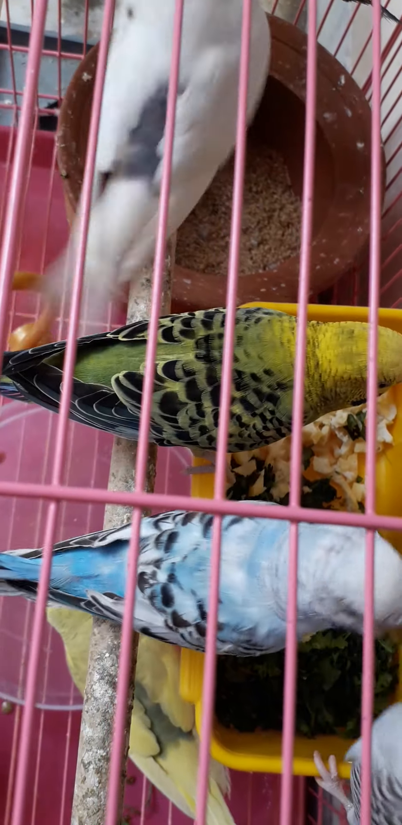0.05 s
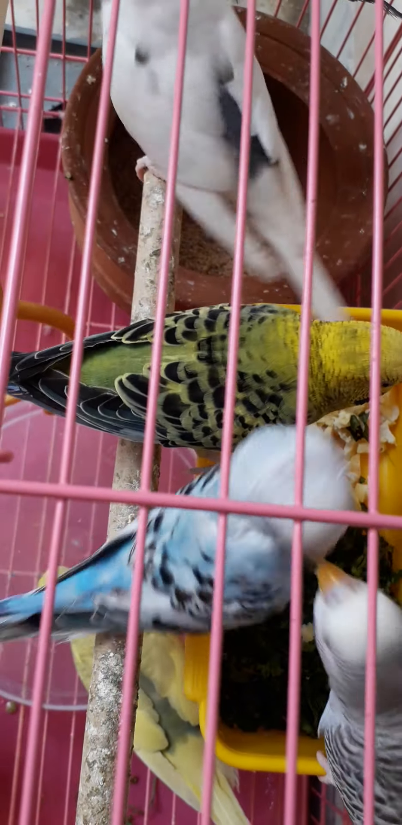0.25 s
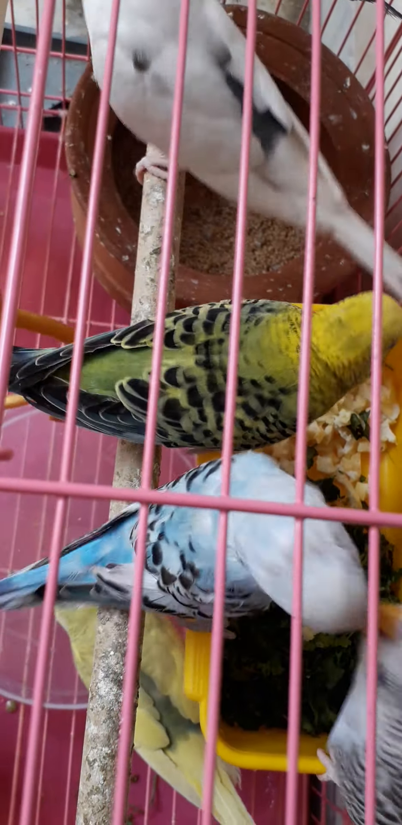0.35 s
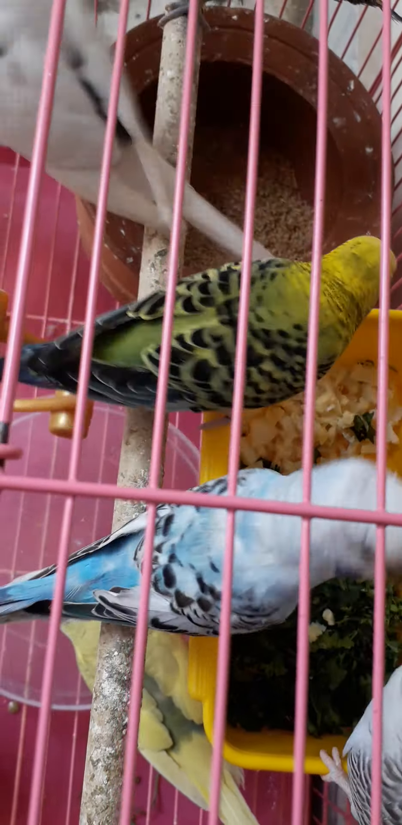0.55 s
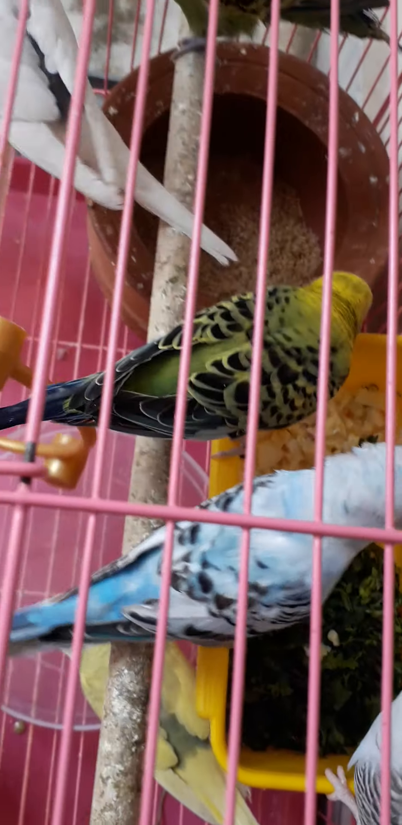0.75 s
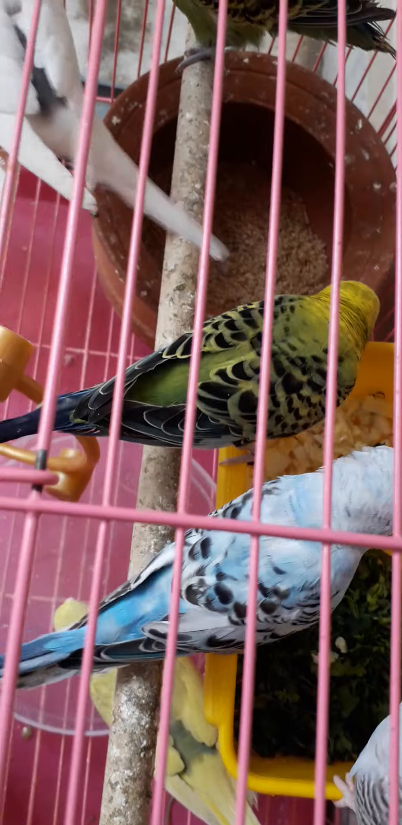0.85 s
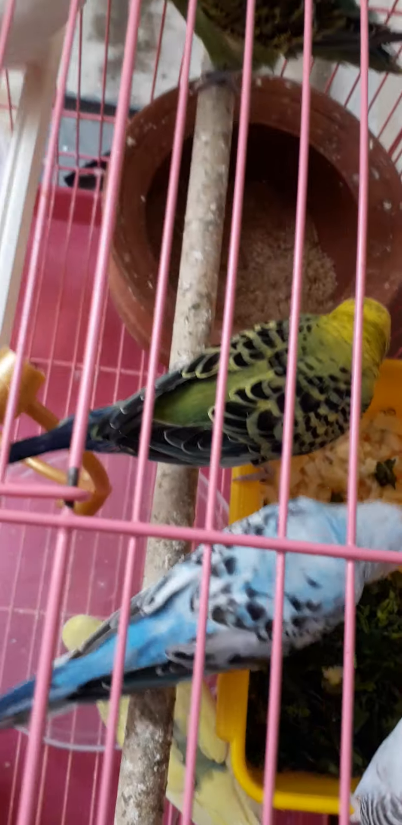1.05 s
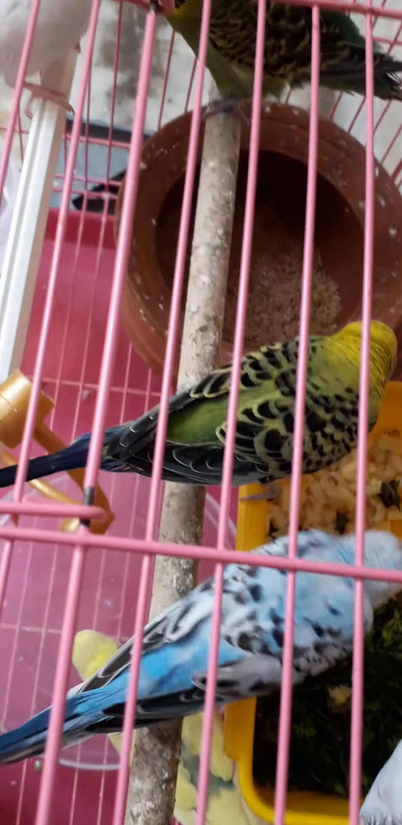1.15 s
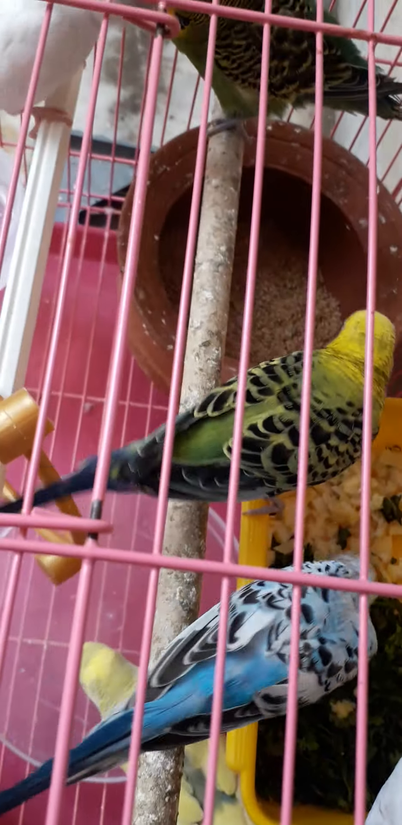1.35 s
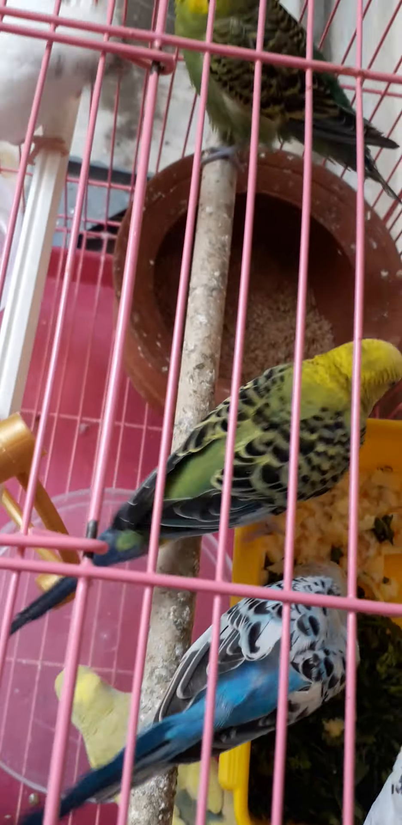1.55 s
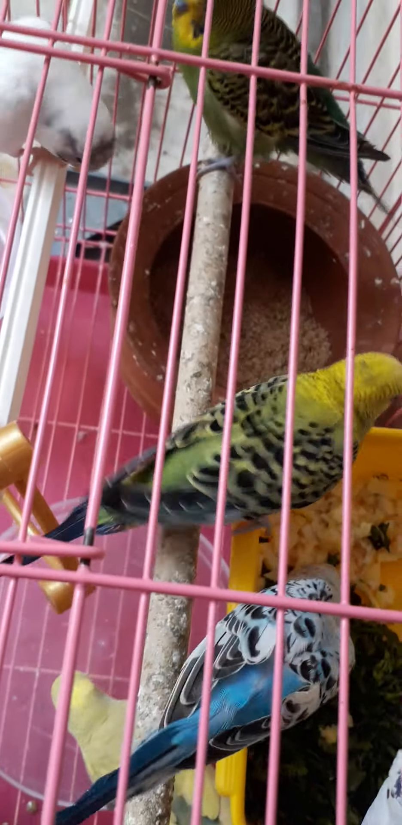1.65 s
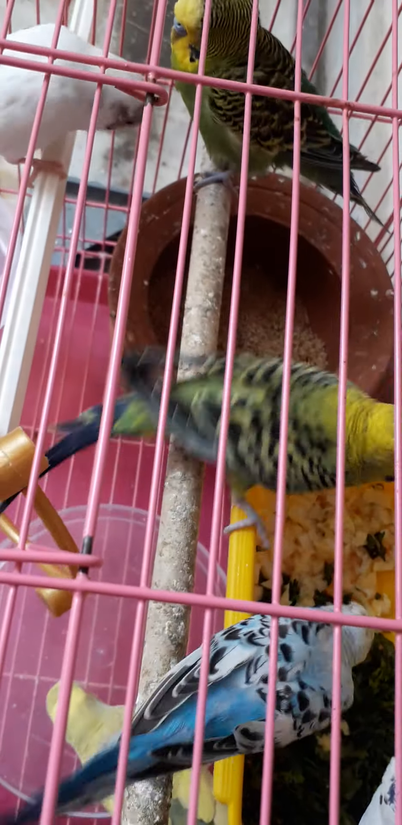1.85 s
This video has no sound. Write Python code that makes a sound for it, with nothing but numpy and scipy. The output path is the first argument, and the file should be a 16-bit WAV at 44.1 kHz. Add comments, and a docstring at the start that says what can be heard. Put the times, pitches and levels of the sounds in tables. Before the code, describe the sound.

Close budgerigar chirps come in a quick string of short, slightly raspy notes, then pause for faint warbles and small beak and claw ticks, ending with one rough chirp; small room, low hum, near microphone.

```python
"""A small room with budgerigars in a wire cage, heard at one microphone.
Close by, a quick run of chirps, then soft warbles from farther back and a last chirp that rises clean and
turns rough: swept tones with an octave, overtones and rasp. Beaks and claws tick on seed and perches as
short noise bursts, feathers and husks rustle as grainy noise, and the room hums low behind them as wavering
sines over steady noise. Chirps, warbles and ticks reflect from near surfaces and leave a short diffuse tail."""
import sys
import numpy as np
from scipy import signal
from scipy.fft import rfft, irfft, next_fast_len
from scipy.io import wavfile
from scipy.ndimage import map_coordinates

SR = 44100
rng = np.random.default_rng(int(sys.argv[2]) if len(sys.argv) > 2 else 0)


def to_wav(s):
    """Save 16-bit WAV."""
    ch = np.atleast_2d(s).T  # columns
    pcm = np.round(np.clip(ch, -1, 1) * 32767)  # PCM
    wavfile.write(sys.argv[1], SR, pcm.astype(np.int16))


N = 83790  # length in samples

# Notes of the near chirps (overlapping rows join into one chirp), levels before swell and filters:
# start_s, length_s, rise_s, fall_s, start_hz, mid_hz, end_hz,
# first_db, octave_db, overtone_db, slope_db (per harmonic), swell_db, rough (0-1)
NEAR_CHIRPS = [ (-.012, .024, 0.0084, 0.011, 1780, 2488, 2230, -29.5, -54, -57, 3, 0, 0.65),
               (0.0403, 0.026, .014, 0.014, 1320, 2156, 1660, -28, -26.5, -49, 2.8, 2.5, 0.35),
               (0.1465, .012, 0.011, .002, 1360, 1734, 1700, -37.5, -33, -50.5, -0.5, 16, 0.07),
               (.2310, 0.064, 0.015, 0.0093, 1270, 2017, 1350, -25, -10, -28.5, 0.4, 21, 0.2),
               (0.3347, 0.033, 0.018, 0.01, 1158, 2090, 1930, -28, -16, -40, 1.9, 11.5, 0.28),
               (0.359, 0.025, 0.0067, 0.0106, 1898, 2162, 1420, -32, -35.5, -53, 3.5, 8, 0.55),
               (0.432, .032, 0.0076, 0.012, 1354, 2274, 1590, -32, -35, -54.5, 3, 2, 0.29),
               (0.507, 0.037, 0.014, 0.022, 1146, 2180, 1610, -30, -28, -46.5, 1.8, 4, 0.42),
               (0.5952, 0.031, .017, 0.01175, 1280, 1995, 1350, -32, -32, -46.5, 1.7, 1.5, 0.5),
               (0.6976, 0.034, 0.012, 0.013, 1455, 2218, 1590, -37, -32.5, -42.5, -3, 1.5, 0.14),
               (0.8417, 0.0224, 0.0053, 0.0079, 1110, 2034, 1560, -31, -23, -39, 1, 6, 0.32),
               (1.7716, 0.018, 0.011, 0.0036, 1515, 2334, 2310, -30, -23.5, -39, -9, 6, 0.17),
               (1.781, 0.0282, 0.0084, 0.0088, 2300, 2595, 2090, -27.5, -41, -45.5, -0.5, -3, 0.68), ]
# Soft warbles farther back: start_s, length_s, start_hz, mid_hz, end_hz, first_db, octave_db
FAR_WARBLES = [ (1.33, .021, 1235, 1977, 1200, -50, -49.5), (1.430, 0.016, 1860, 1714, 1560, -51, -46.5),
               (1.472, 0.0127, 1580, 2215, 2380, -47.5, -63), (1.583, 0.0157, 1270, 1532, 1700, -45, -50.5),
               (1.615, 0.0135, 1223, 1270, 1400, -40.5, -59), (1.625, .012, 1420, 2125, 2300, -45, -50),
               (1.684, 0.012, 1390, 1720, 1650, -43.5, -45), ]
# Beak's filter on the octave: frequency_hz, gain_db
BEAK_FILTER = [(2500, 5.5), (3200, 5), (3700, -2.5), (4150, -1), (4550, -12.5), (5200, -14.5)]
# Throat's filter on the overtones: frequency_hz, gain_db
THROAT_FILTER = [(2500, -14), (3600, 6), (5000, 1), (6200, -6.5), (7200, -4), (8200, -5.5), (10000, -9),
                 (11200, -12.5), (12400, -15), (13600, -19), (15000, -28), (16000, -24)]
# Spectrum of the rasp: frequency_hz, relative_db
RASP_COLOUR = [(300, -19), (1000, -9.5), (1700, -12), (3300, -1.5), (4400, 2.5), (5500, -15), (8200, -19.5),
               (12500, -27), (14000, -34), (16000, -52)]
# Beak and claw ticks: start_s, level_db (before decay), t60_s
CAGE_TICKS = [(.192, -43.5, .012), (.465, -44, 0.018), (.567, -37.5, 0.014), (.637, -57, 0.01),
              (.652, -44, 0.013), (.669, -63, .014), (1.05, -45, 0.0039), (1.063, -40.5, .022),
              (1.073, -60, 0.018), (1.1154, -44.5, .01), (1.4017, -49, 0.018), (1.428, -51, 0.018),
              (1.4495, -52, 0.008), (1.660, -50, 0.018), (1.752, -55, .012), (1.885, -52, 0.026)]
# Spectrum of a tick: frequency_hz, relative_db
TICK_SPECTRUM = [(500, -31), (2500, -17), (5000, -3), (7500, -0.5), (10000, 0), (14000, -10),
                 (16000, -15.5)]
# Rise and fall of feathers and husks: time_s, level_db
RUSTLE_LEVEL = [(0, -53.5), (.5, -61), (.66, -52), (.8, -65), (1.042, -64.5), (1.075, -64), (1.142, -60),
                (1.252, -70), (1.37, -70), (1.44, -54.5), (1.58, -61.5), (1.65, -74), (1.69, -53.5),
                (1.739, -60), (1.9, -56.5)]
# Spectrum of the rustle: frequency_hz, relative_db
RUSTLE_SPECTRUM = [(1000, -44), (3500, -2), (6000, -17), (8000, -19), (13000, -22), (16000, -23)]
# Motor hum partials, before waver and drift: frequency_hz, level_db
HUM_PARTIALS = [(64, -66.5), (123.8, -59), (166, -54), (246.5, -57), (296, -62)]
# Slow drift of the hum: time_s, gain_db
HUM_DRIFT = [(0, -2.5), (.2, 3.5), (.6, 0), (.85, 6.5), (1.12, -3.5), (1.35, 6.5), (1.6, 4), (1.9, 6)]
# Spectrum of the steady room noise: frequency_hz, relative_db
ROOM_NOISE_COLOUR = [(15, -87), (25, -66), (49, -18), (96, -16), (110, -8), (161, -2.5), (189, -10),
                     (229, -11.5), (372, -12), (528, -19.5), (1600, -18.5), (1880, -24), (3400, -23.5),
                     (6150, -41.5), (15800, -89)]
# Reflections from near surfaces: delay_s, gain_db
NEAR_SURFACES = [(.0017, -21), (.0031, -13.5), (.0052, -25), (.0074, -13), (.0098, -23), (0.0129, -26),
                 (0.0174, -26)]
# Decay time of the diffuse tail: frequency_hz, t60_s
TAIL_T60 = [(300, 0.12), (2000, 0.23), (4000, 0.15), (8000, 0.15), (15000, 0.06)]
# Spectrum of the diffuse tail, added to its wet level: frequency_hz, gain_db
TAIL_COLOUR = [(300, -35), (2100, 9.5), (4000, 1.5), (8000, 6), (15000, 4.5)]

# Flutter of a fully rough note; rates are random knots per second
JITTER, JITTER_RATE = 0.066, 901  # share of the pitch
SHIMMER_DB, SHIMMER_RATE = 4, 370
OVERTONE_BLUR_RAD, BLUR_RATE = 0.9, 900
RASP_DB = -10  # against the tone, for a fully rough note
TREMOR_HZ, TREMOR_PEAK_S = 57.7, 0.014  # rate, time of first crest
TREMOR_PITCH, TREMOR_SWELL = 0.012, 0.1  # shares of the pitch and of the swell
ATTACK_S, RELEASE_S = 0.0012, 0.003
SWELL_UP, SWELL_DOWN = 0.45, 0.22  # shares of a note's length
OVERTONE_DB_PER_OCTAVE = 3.5  # overtones grow as the pitch climbs
WARBLE_RISE, WARBLE_FALL = 0.737, 0.36  # shares of a warble's length
WARBLE_OVERTONE_DB, WARBLE_SLOPE_DB, WARBLE_SWELL_DB, WARBLE_ROUGH = -59, -4, 2, 0.2
CHIRP_WET_DB, WARBLE_WET_DB, TICK_WET_DB = -14.5, -8, -4  # diffuse tail, before its colour
TAIL_DELAY_S = 0.005
TICK_ATTACK_S = 0.0009
RUSTLE_GRAIN_DB, RUSTLE_GRAIN_RATE = 2.5, 250
WAVER_DB, WAVER_RAD, WAVER_RATE = 2, 0.99, 7  # hum's random level and phase
ROOM_NOISE_DB = -47
TOP_HZ = 15900


def chirps():
    """The near birds' loud chatter, each note sounding in the room."""
    out = np.zeros(N)
    for start_s, *voice in NEAR_CHIRPS:
        add(out, start_s, in_room(note(*voice), CHIRP_WET_DB))
    return out


def note(length, rise, fall, start_hz, mid_hz, end_hz,
         first_db, octave_db, overtone_db, slope_db, swell_db, rough):
    """The syrinx bends its pitch in and out with a tremor; throat and beak filter the swelling tone."""
    size = int(length * SR)
    t = np.arange(size) / SR
    bend_in = np.clip(1 - t / rise, 0, 1) ** 2
    bend_out = np.clip(1 - (length - t) / fall, 0, 1) ** 2
    pitch = mid_hz - (mid_hz - start_hz) * bend_in - (mid_hz - end_hz) * bend_out
    tremor = np.cos(2 * np.pi * TREMOR_HZ * (t - TREMOR_PEAK_S))
    jitter = JITTER * rough * wobble(JITTER_RATE, size)
    phase = 2 * np.pi * np.cumsum(pitch * (1 + TREMOR_PITCH * tremor + jitter)) / SR

    u = t / length
    quiet_start = np.clip(1 - u / SWELL_UP, 0, 1)
    quiet_end = np.clip(1 - (1 - u) / SWELL_DOWN, 0, 1) ** 2
    swell = swell_db * (TREMOR_SWELL * tremor - quiet_start - quiet_end)

    def shimmer():
        """Random level flutter, drawn afresh for each harmonic."""
        return amp(SHIMMER_DB * rough * wobble(SHIMMER_RATE, size))

    first = amp(first_db + swell / 2)  # the fundamental swells half as far in dB
    octave = amp(octave_db + swell + along(BEAK_FILTER, 2 * pitch))
    tone = first * shimmer() * np.sin(phase) + octave * shimmer() * np.sin(2 * phase)

    overtones = np.zeros(size)
    for k in range(3, 9):
        blur = OVERTONE_BLUR_RAD * rough * wobble(BLUR_RATE, size)
        overtones += amp((k - 3) * slope_db) * shimmer() * np.sin(k * (phase + blur))
    bright = amp(overtone_db + swell + OVERTONE_DB_PER_OCTAVE * np.log2(pitch / mid_hz))
    tone += filtered(bright * overtones, lambda hz: amp(along(THROAT_FILTER, hz)))

    rasp = rough * amp(RASP_DB) * np.hypot(first, octave) * noise(RASP_COLOUR, SR // 8)[:size]
    fade = np.clip(t / ATTACK_S, 0, 1) * np.clip((length - t) / RELEASE_S, 0, 1)
    return (tone + rasp) * fade


def warbles():
    """Small quiet notes from birds farther back, with more room around them."""
    out = np.zeros(N)
    for start_s, length, *voice in FAR_WARBLES:
        call = note(length, WARBLE_RISE * length, WARBLE_FALL * length, *voice,
                    WARBLE_OVERTONE_DB, WARBLE_SLOPE_DB, WARBLE_SWELL_DB, WARBLE_ROUGH)
        add(out, start_s, in_room(call, WARBLE_WET_DB))
    return out


def ticks():
    """Beaks and claws strike seed and perches: bursts of coloured noise that die exponentially."""
    out = np.zeros(N)
    t = np.arange(SR // 20) / SR
    for start_s, level_db, t60 in CAGE_TICKS:
        decay = np.exp(-np.log(1000) * t / t60)
        crack = noise(TICK_SPECTRUM, len(t)) * decay * np.clip(t / TICK_ATTACK_S, 0, 1)
        add(out, start_s, in_room(amp(level_db) * crack, TICK_WET_DB))
    return out


def rustle():
    """Feathers and seed husks brush: coloured noise with a random grain in its level."""
    level_db = np.interp(np.arange(N) / SR, *np.transpose(RUSTLE_LEVEL))
    grain = amp(RUSTLE_GRAIN_DB * wobble(RUSTLE_GRAIN_RATE, N))
    return amp(level_db) * unit(noise(RUSTLE_SPECTRUM, N) * grain)


def motor_hum():
    """Low steady partials, each wavering in level and phase, under one slow drift."""
    t = np.arange(N) / SR
    hum = np.zeros(N)
    for hz, level_db in HUM_PARTIALS:
        level = amp(level_db + WAVER_DB * wobble(WAVER_RATE, N))
        phase = 2 * np.pi * (hz * t + rng.random()) + WAVER_RAD * wobble(WAVER_RATE, N)
        hum += level * np.sin(phase)
    return amp(np.interp(t, *np.transpose(HUM_DRIFT))) * hum


def room_noise():
    """Steady coloured noise of the room."""
    return amp(ROOM_NOISE_DB) * noise(ROOM_NOISE_COLOUR, N)


def in_room(x, wet_db):
    """A short sound with reflections from near surfaces and a diffuse tail decaying by frequency."""
    hz, t, z = signal.stft(rng.standard_normal(SR // 2), SR, nperseg=256)
    decay = amp(-60 * t / along(TAIL_T60, hz)[:, None])
    tail = unit(signal.istft(z * decay, SR)[1])
    tail = tail / np.sqrt(len(tail))  # total energy 1
    tail = filtered(tail, lambda f: amp(wet_db + along(TAIL_COLOUR, f)))
    answer = np.pad(tail, (int(TAIL_DELAY_S * SR), 0))
    answer[0] += 1  # direct sound
    for delay_s, gain_db in NEAR_SURFACES:
        answer[int(delay_s * SR)] += amp(gain_db)
    return signal.fftconvolve(x, answer)


def amp(db):
    """Decibels to gain."""
    return 10 ** (np.asarray(db) / 20)


def unit(x):
    """Scale to rms 1."""
    return x / np.sqrt(np.mean(x ** 2) + 1e-20)


def along(points, hz):
    """Read (frequency_hz, value) points on a log frequency axis."""
    f, v = np.transpose(points)
    return np.interp(np.log(hz + 1), np.log(f + 1), v)


def wobble(rate, size):
    """A smooth random curve with rate knots a second."""
    return map_coordinates(rng.standard_normal(4096), [np.arange(size) * rate / SR], mode="wrap")


def filtered(x, response):
    """Filter x by a gain that depends on frequency."""
    m = next_fast_len(len(x) + 8192)
    spectrum = rfft(x, m) * response(np.fft.rfftfreq(m, 1 / SR))
    return irfft(spectrum, m)[:len(x)]


def noise(colour, size):
    """Coloured noise of rms 1."""
    return unit(filtered(rng.standard_normal(size), lambda hz: amp(along(colour, hz))))


def add(track, start_s, sound):
    """Mix a sound into the track, cutting what falls outside it."""
    at = round(start_s * SR)
    part = sound[max(-at, 0):max(N - at, 0)]
    track[max(at, 0):][:len(part)] += part


def scene():
    """Birds, cage and room at one microphone."""
    birds = chirps() + warbles()
    cage = ticks() + rustle()
    background = motor_hum() + room_noise()
    return (birds + cage + background)[None]


def record(dry):
    """The recorder keeps nothing above its band limit."""
    return np.array([filtered(x, lambda hz: hz < TOP_HZ) for x in dry])


dry = scene()
out = record(dry)
to_wav(out)
```